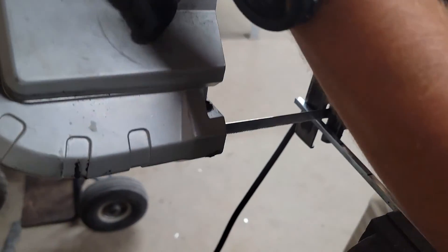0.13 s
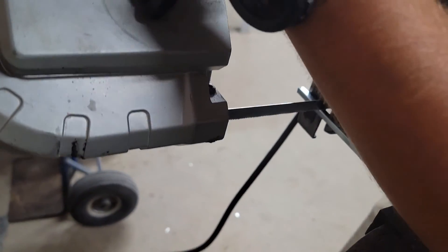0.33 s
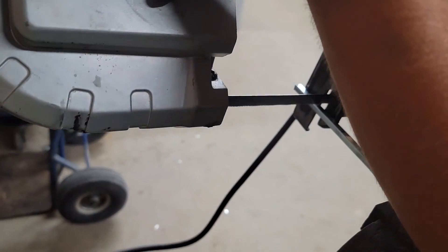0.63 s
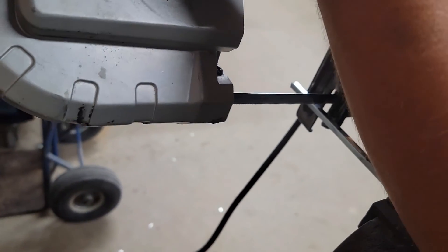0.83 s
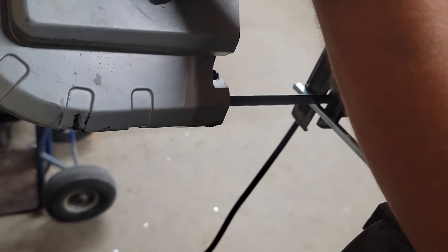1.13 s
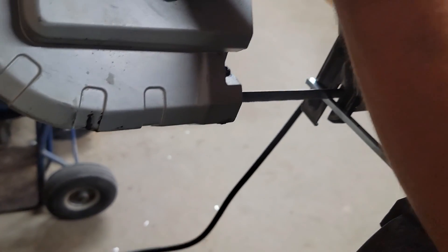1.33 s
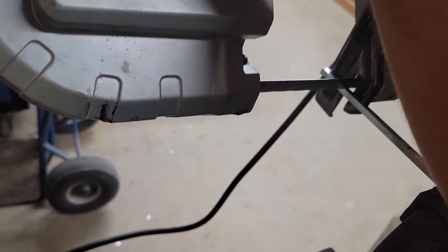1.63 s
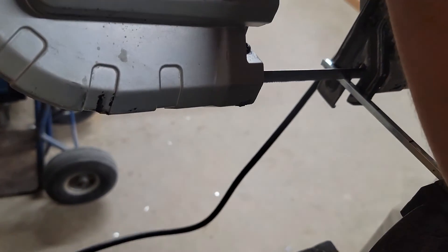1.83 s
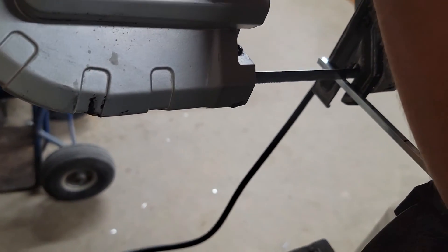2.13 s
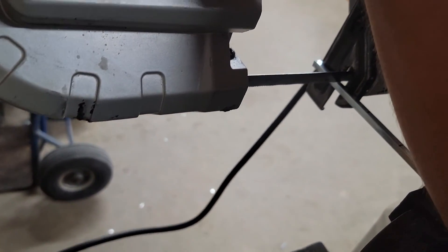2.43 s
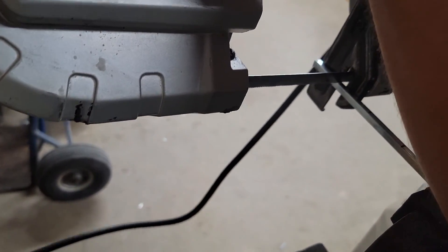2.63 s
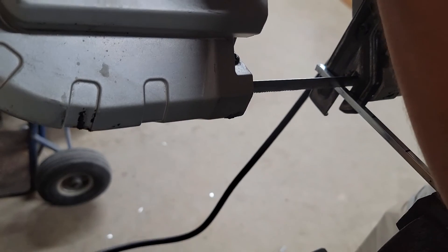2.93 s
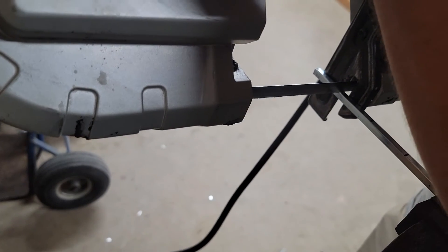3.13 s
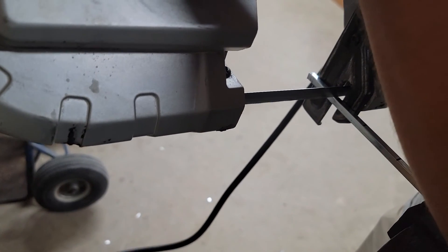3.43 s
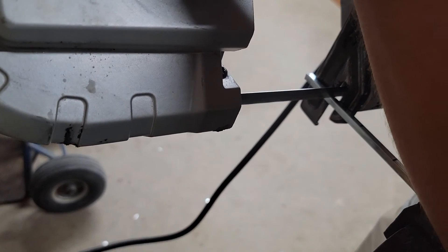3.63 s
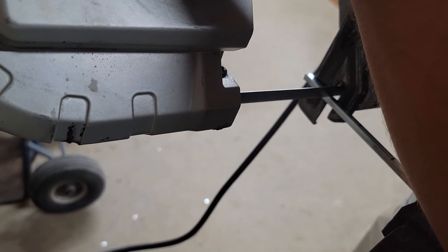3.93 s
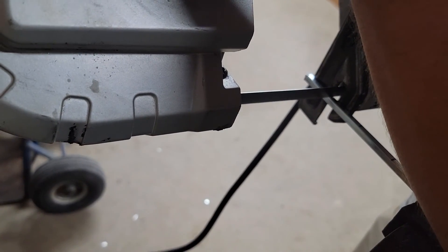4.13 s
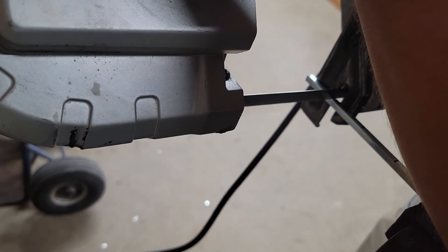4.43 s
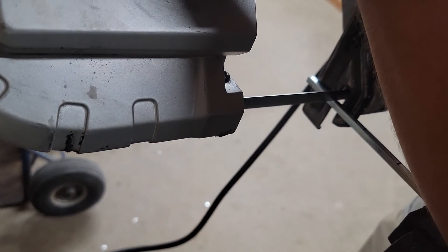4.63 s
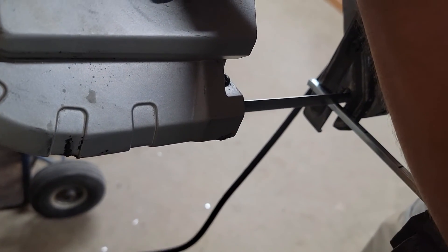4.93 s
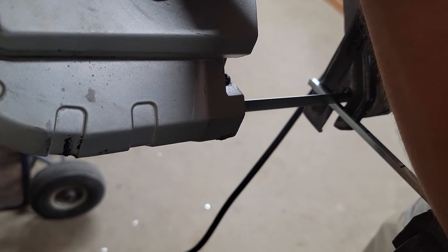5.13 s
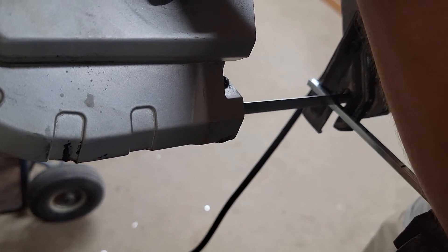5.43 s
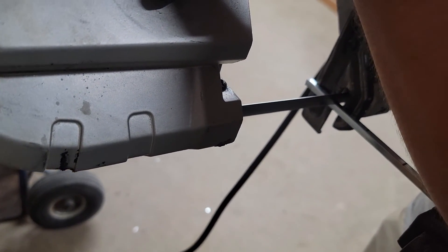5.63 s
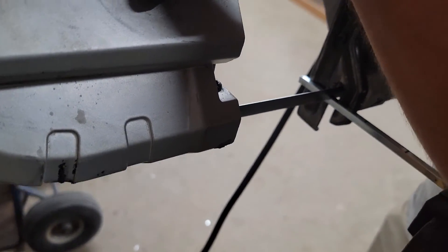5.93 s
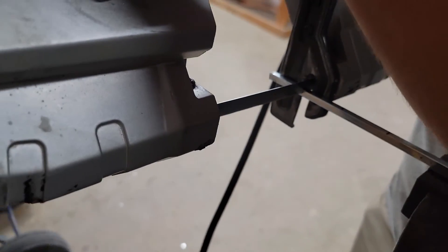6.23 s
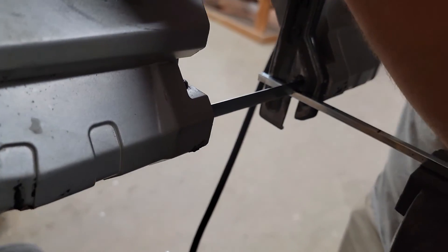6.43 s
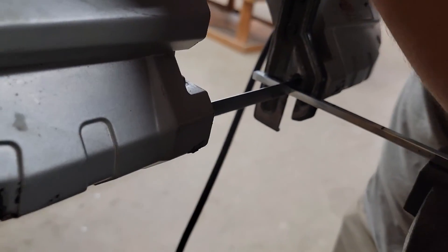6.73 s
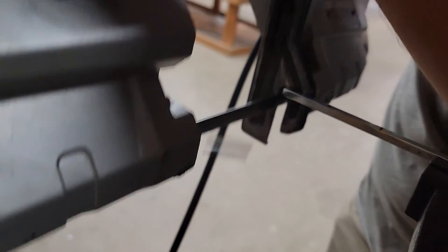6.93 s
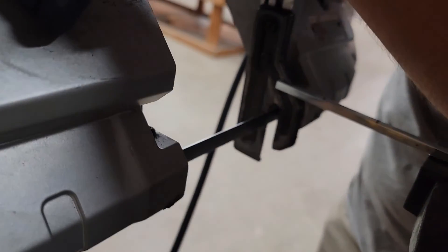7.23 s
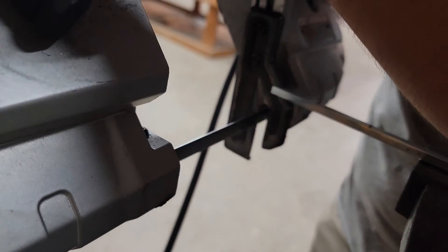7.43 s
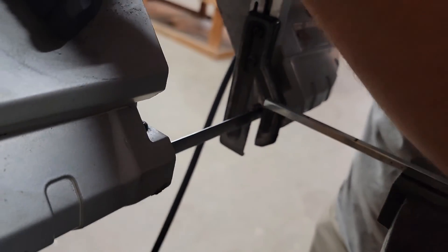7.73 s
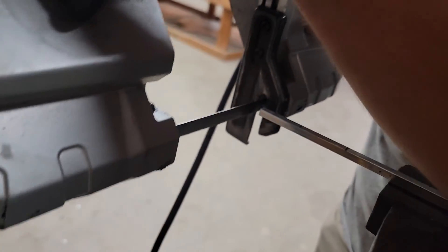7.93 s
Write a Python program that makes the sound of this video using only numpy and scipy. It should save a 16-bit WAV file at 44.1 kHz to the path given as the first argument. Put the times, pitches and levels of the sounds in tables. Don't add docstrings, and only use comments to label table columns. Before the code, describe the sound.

A hand-held saw knocks and buzzes while stalled, then roars into a harsh metal cut with whining gears before its pitch sinks on release.

```python
import sys
import numpy as np
from scipy import signal
from scipy.fft import rfft, irfft, next_fast_len
from scipy.io import wavfile
from scipy.ndimage import map_coordinates

SR = 44100
rng = np.random.default_rng(int(sys.argv[2]) if len(sys.argv) > 2 else 0)


def dump(signal):
    limited = np.clip(np.atleast_2d(signal).T, -1, 1)
    pcm = np.round(limited * 32767).astype(np.int16)
    wavfile.write(sys.argv[1], SR, pcm)


def volts_from_db(level):
    exponent = np.asarray(level, float) / 20
    return 10 ** exponent


N = 355975


def unit(x):
    return x / np.sqrt(np.mean(x ** 2) + 1e-20)


def along(points, hz):
    f, v = np.transpose(points)
    return np.interp(np.log(hz + 1), np.log(f + 1), v)


def curves(rows):
    s, *cols = np.transpose(rows)
    t = np.arange(N) / SR
    gate = np.clip(np.minimum(t - s[0], s[-1] + .01 - t) / .01, 0, 1)
    return [gate] + [np.interp(t, s, c) for c in cols]


def wobble(rate):
    knots = rng.standard_normal(int(N * rate / SR) + 4)
    return map_coordinates(knots, [np.arange(N) * rate / SR])


def filtered(x, response):
    m = next_fast_len(N + SR // 2)
    return irfft(rfft(x, m) * response(np.fft.rfftfreq(m, 1 / SR)), m)[..., :N]


def coloured(x, spectrum):
    return unit(filtered(x, lambda hz: volts_from_db(along(spectrum, hz))))


def modes(peaks):
    def response(f):
        total = 0
        for k, (centre, width, db) in enumerate(peaks):
            damping = 1j * f * width
            total = total + (-1) ** k * volts_from_db(db) * damping / (centre * centre - f * f + damping)
        return total
    return response


def grit(spread_db, speed):
    return rng.standard_normal(N) * volts_from_db(spread_db * wobble(speed))


# [f/Hz, level/dB]
AIR_SPECTRUM = [(18, -45), (30, -18), (43, -5.5), (75, -3), (127, -13.5), (145, -21.5), (232, -20.5),
                (258, -22.5), (344, -21), (459, -22.5), (1530, -30.5), (2210, -32), (4610, -43.5),
                (15800, -59)]
# [f/Hz, likeness -1..1]
AIR_LIKENESS = [(60, 0.55), (180, 1), (550, -0.38), (1650, -0.39), (4970, 0.31), (15000, 0.0)]


def background():
    def spread(hz):
        turn = np.arccos(np.clip(along(AIR_LIKENESS, hz), -1, 1)) / 2
        return volts_from_db(along(AIR_SPECTRUM, hz)) * [np.cos(turn), np.sin(turn)]

    noise = rng.standard_normal((2, N)) * volts_from_db(1.1 * wobble(9))
    mid, side = filtered(noise, spread)
    return volts_from_db(-58) * unit(np.array([mid + side, mid - side]))


# [f/Hz, t60/s]
SHOP_DECAY = [(100, 1), (1000, 0.95), (4000, 0.49), (14000, 0.69)]
# [f/Hz, level/dB]
ECHO_LEVEL = [(60, -12), (250, 4), (600, -0.5), (1500, -5.5), (3000, 8.5), (6000, 2.5), (14000, 8)]


def shop(x, early_db=-6.0, size=24576):
    hop = size // 2
    wet = filtered(x, lambda hz: volts_from_db(along(ECHO_LEVEL, hz)))
    wet = np.pad(wet, (hop + 130, size))
    window = np.sin(np.pi * np.arange(size) / size)
    out = np.zeros((2, len(wet) + SR))
    for start in range(0, N + hop, hop):
        hz, t, z = signal.stft(rng.standard_normal((2, SR // 2)), SR, nperseg=256)
        late = volts_from_db(-60 * t / along(SHOP_DECAY, hz)[:, None] - 8.5)
        early = volts_from_db(early_db - 60 * t / 0.014)
        tail = signal.istft(z * (late + early), SR, nperseg=256)[1]
        piece = wet[start:start + size] * window
        echo = signal.fftconvolve(piece[None], tail / np.linalg.norm(tail[0]), axes=1)
        out[:, start:start + echo.shape[1]] += echo
    return out[:, hop:hop + N]


# [t/s, level/dB, hiss over it/dB]
SLIDES = [
    [(0.0, -41, -4), (0.038, -54.5, -12), (0.3, -69.5, -2)],
    [(0.605, -41.5, -12), (0.677, -33, -3.5), (0.95, -89, -17)],
]
# [f/Hz, level/dB]
RUB_SPECTRUM = [(88, -55), (150, -22), (297, -8), (406, -6), (540, -11.5), (851, -4.5), (1690, -2.5),
                (2120, 2.5), (4500, -13), (5850, -40), (9900, -120)]
HISS_SPECTRUM = [(2060, -20), (3500, 0), (4500, -5), (6530, -5), (10100, -21), (10900, -24), (15400, -16),
                 (16300, -25)]


def scrape():
    rub = coloured(grit(spread_db=-2.0, speed=160), RUB_SPECTRUM)
    hiss = coloured(grit(spread_db=0.0, speed=170), HISS_SPECTRUM)
    total = 0
    for gate, db, hiss_db in map(curves, SLIDES):
        total = total + gate * volts_from_db(db - 2.0) * (rub + volts_from_db(hiss_db) * hiss)
    return total


# [t/s, peak level/dB, thud over it/dB]
HAND_BUMPS = [(.232, -53, -18), (.35, -61.5, 14.5), (.404, -49, -9), (.463, -41.5, -19), (.4995, -53, -8),
              (.828, -52, -15), (.866, -52.5, -40), (1.118, -52, -27), (1.154, -63, -15), (1.692, -64, -25),
              (2.943, -40, -22), (3.041, -40.5, -21), (3.209, -37, -39)]
# [t/s, peak level/dB, tick over it/dB]
BLADE_JOLTS = [(.578, -40, -21), (.5875, -23.5, -26), (.596, -31, -24), (2.318, -40.5, -11),
               (2.384, -45, -10), (2.744, -45, -7), (2.785, -41, -8), (2.82, -43.5, -6), (2.963, -36, -16),
               (3.012, -42, -26), (3.18, -40, -25), (3.319, -67, -55), (3.368, -36, -22), (3.775, -26, -9)]
# [t/s, peak level/dB, housing over it/dB]
TOOTH_TAPS = [(1.081, -53.5, 9), (1.3335, -56, 11), (1.351, -34.5, -2.5), (1.391, -42.5, 0.5),
              (1.496, -51.5, 3)]
# [thud/dB, housing/dB, clack/dB, tick/dB, t60/s]; None = the row's own column
BUMP_MIX = (None, .1, -11, -19, 0.061)
JOLT_MIX = (-26, -8, .1, None, 0.054)
TAP_MIX = (-36, None, .1, -0.66, 0.037)
# [f/Hz, width/Hz, level/dB]
THUD_MODES = [(85, 18, -2), (249, 120, 6), (366, 115, 2)]
CASE_MODES = [(556, 24, 5), (647, 9.1, 3.5), (804, 39, 5), (1209, 24, 9), (1435, 69, -11.5)]
CLACK_MODES = [(1860, 510, 3.5), (2580, 520, 7.5), (3630, 1300, -13.5)]
TICK_MODES = [(5300, 1200, -4), (6750, 700, 0), (7600, 700, 0), (9500, 1500, -12), (13000, 3000, -20)]


def knocks():
    force = np.zeros((4, N + SR))
    t = np.arange(SR // 5) / SR
    rise = 1 - np.exp(-t / np.array([[.003], [.003], [.0008], [.0003]]))
    faster = np.array([[.8], [1], [1.3], [2.2]])
    part_gain_db = np.array([27.5, 19.5, 14, 14])
    kinds = [(HAND_BUMPS, BUMP_MIX), (BLADE_JOLTS, JOLT_MIX), (TOOTH_TAPS, TAP_MIX)]
    for rows, (*mix_db, t60) in kinds:
        fall_db = -60 * t / np.clip(t60, .01, .2) * faster
        for s, db, own_db in rows:
            parts_db = np.array([own_db if part is None else part for part in mix_db])
            level_db = db + parts_db + part_gain_db
            rattle = rng.standard_normal(len(t)) * volts_from_db(level_db[:, None] + fall_db) * rise
            start = round(s * SR)
            force[:, start:start + len(t)] += rattle
    bodies = [THUD_MODES, CASE_MODES, CLACK_MODES, TICK_MODES]
    return sum(filtered(f[:N], modes(body)) for f, body in zip(force, bodies))


# [t/s, buzz level/dB]
SQUEEZES = [
    [(2.3, -64), (2.32, -46), (2.345, -54.5), (2.5, -47.5), (2.65, -45.5), (2.76, -47), (2.81, -45),
     (2.85, -49), (2.91, -55)],
    [(2.92, -55), (2.96, -39), (3.01, -46), (3.08, -50.5), (3.2, -42.5), (3.3, -45), (3.45, -37),
     (3.7, -48), (3.8, -26)],
]
# [f/Hz, width/Hz, level/dB]
COIL_MODES = [(228, 21, -19), (479, 3.2, -6), (690, 55, 0.5), (1416, 31, -10), (1820, 180, -10.5),
              (2340, 135, -4.5), (3110, 120, -12.5), (4630, 460, -27)]
# [mains order, level/dB]
CORE_HUM = [(2, -10), (4, 5), (6, 1.5), (8, 8)]
CORE_HUM_DB = (-56.5, -57.5)
# [from t/s, to t/s, level/dB]
ARCING = [
    (2.299, 2.834, -55.5),
    (2.898, 2.98, -54.5),
    (3.15, 3.8, -67),
]
# [f/Hz, level/dB]
SIZZLE_SPECTRUM = [(2000, -11), (3400, 1.5), (3720, -14), (4970, -8), (6760, -13), (7840, -2), (9150, -12),
                   (11100, -28), (11900, -18), (12700, -5), (15100, -27), (15800, -34)]
MAINS_HZ = 60
CREEP_S, CREEP_ROUGHENS_PER_S = 2.95, 3
HUM_FOLLOWS = .2


def stall():
    half = np.arange(N) * 2 * MAINS_HZ / SR + .62
    count = np.floor(half)
    kicks = np.diff(count, prepend=0) * np.where(count % 2, 1, .5) * volts_from_db(1.8 * wobble(90))
    rough = .45 + CREEP_ROUGHENS_PER_S * np.clip(np.arange(N) / SR - CREEP_S, 0, .5)
    drive = (unit(kicks) + rough * rng.standard_normal(N)) / np.hypot(1, rough)
    buzz = unit(filtered(drive, modes(COIL_MODES)))
    hum = unit(sum(volts_from_db(db) * np.sin(np.pi * order * half + order ** 2) for order, db in CORE_HUM))
    spark = .15 + np.exp(-((half / 2 - .43) % 1) / .12)
    sizzle = coloured(spark * rng.standard_normal(N), SIZZLE_SPECTRUM)
    arcing = sum(volts_from_db(db) * curves([(start,), (end,)])[0] for start, end, db in ARCING)
    core = 0
    for (gate, db), hum_db in zip(map(curves, SQUEEZES), CORE_HUM_DB):
        core = core + gate * (volts_from_db(db) * buzz + volts_from_db(hum_db + HUM_FOLLOWS * (db + 47)) * hum)
    return core + arcing * sizzle


# [t/s, peak level/dB]
SEAM_PASSES = [
    (4.4994, -95),
    (5.0619, -4),
    (5.6144, -4.5),
    (6.1723, -2.5),
    (6.7406, -6),
    (7.2994, -22),
]


def weld():
    shape = np.zeros(N + SR)
    t = np.arange(SR // 10) / SR
    for s, db in SEAM_PASSES:
        shape[round(s * SR):][:len(t)] += volts_from_db(db - 8.0 - 60 * t / 0.046)
    spit = coloured(rng.standard_normal(N), [(3000, -40), (5000, 4), (9000, 12.0), (16000, -3.0)])
    return shape[:N] * spit


# [t/s, gear mesh f/Hz]
MESH_SPEED = [(3.55, 590), (3.64, 715), (3.69, 612), (3.9, 1095), (4.0, 1400), (4.14, 2360), (4.2, 2703),
              (4.3, 3003), (4.42, 3150), (4.55, 3235), (4.7, 3292), (5.0, 3322), (5.3, 3308), (5.5, 3281),
              (6.1, 3239), (6.6, 3206), (6.9, 3223), (7.15, 3270)]
# [level at full speed/dB, growth with speed, once tipped/dB, once unloaded teeth rattle/dB]
MESH_ORDERS = [(-40, .3, 9, -11), (-29, 1.3, -6, -2), (-38.5, .8, -1.5, 2), (-34.5, 1.5, -5, 2)]
# [shaft order, level at full speed/dB, growth with speed]
SHAFT_ORDERS = [(12, -38, 1.7), (24, -41, 1.2), (36.4, -37, 3)]
# [f/Hz, level/dB]
CASING = [(600, -7), (1300, 10), (2300, 11.5), (3400, 4), (4400, -8), (5700, 1), (7000, 0), (13000, -6)]
PINION, GEAR = 9, 65
RELEASE_S, DRAG_PER_S, RUB_HZ, FULL_HZ = 7.2, .89, 800, 3300
SHAFT_DB, SHAFT_GROWS = -49, 2.4
TIP_S, TIP_TAKES_S = 5.95, .35


def gears():
    t = np.arange(N) / SR
    coasting = np.maximum(t - RELEASE_S, 0)
    mesh_hz = (curves(MESH_SPEED)[1] + RUB_HZ) * np.exp(-DRAG_PER_S * coasting) - RUB_HZ
    speed = mesh_hz / FULL_HZ
    mesh = 2 * np.pi * np.cumsum(mesh_hz) / SR
    shaft = mesh / PINION
    whine = volts_from_db(SHAFT_DB + 5.5 * wobble(35)) * speed ** SHAFT_GROWS * np.sin(shaft + 1.6 * wobble(25))

    tipped = np.clip((t - TIP_S) / TIP_TAKES_S, 0, 1)
    unloaded = np.minimum(coasting / .1, 1)
    runouts = [2.2, 1.4, .6, 1.3]
    for k, ((db, growth, tip_db, rattle_db), runout) in enumerate(zip(MESH_ORDERS, runouts), 1):
        swell = unit(1 + runout * np.sin(mesh / GEAR + k))
        level_db = db + tip_db * tipped + rattle_db * unloaded + along(CASING, k * mesh_hz)
        tone = np.sin(k * mesh + .4 * wobble(35))
        whine += volts_from_db(level_db + 2.8 * wobble(12)) * speed ** growth * swell * tone

    for order, db, growth in SHAFT_ORDERS:
        level_db = db + along(CASING, order * mesh_hz / PINION) + 3 * wobble(4.4)
        whine += volts_from_db(level_db) * speed ** growth * np.sin(order * shaft + .45 * wobble(40))
    turning = np.clip((t - MESH_SPEED[0][0]) / .03, 0, 1)
    return turning * np.sqrt(2) * whine


# [t/s, housing roar level/dB]
CUT_ROAR = [(3.05, -55.5), (3.25, -46), (3.5, -40.5), (3.65, -32), (3.95, -23), (4.1, -16), (4.3, -15.5),
            (5.0, -15.5), (5.2, -17), (5.5, -15.5), (5.7, -18), (6.1, -17), (6.9, -17.5), (7.15, -17),
            (7.35, -19.5), (7.6, -22.5), (7.9, -28), (8.07, -31)]
# [f/Hz, width/Hz, level/dB]
HOUSING_MODES = [(803, 227, 0.5), (1271, 374, -1.5)]
# [f/Hz, level/dB]
ROAR_SPECTRUM = [(180, -62), (300, -10), (355, -3.5), (452, -6), (521, -4), (818, -5.5), (899, -7.5),
                 (1230, 0), (1500, 3.5), (1950, -55), (3300, -120)]
BAR_SPECTRUM = [(1300, -36), (1520, -4), (1720, 4), (1900, 1), (2200, -9.5), (2500, -28)]
RING_SPECTRUM = [(1240, -22), (2100, 5.5), (2420, 7), (2750, 2), (3270, 2), (3760, -1.5), (4600, -5.5),
                 (5780, -6), (6610, -4.5), (8000, -22), (10400, -43), (17600, -120)]
FIZZ_SPECTRUM = [(4120, -19), (7000, -0.5), (8680, -8), (9610, -6.5), (10400, -10), (11400, -11),
                 (14400, -1.5), (15200, -1), (15800, -16.5)]
RUMBLE_SPECTRUM = [(32, -53), (55, -18), (151, -10.5), (226, -4.5), (269, -6), (355, -2), (448, -16),
                   (500, 0.5), (650, -5.5), (1100, -120)]
BAR_DB, BAR_FADES_DB_PER_S = 1, 2.5
RING_DB, RING_LAGS = -3, 0.17
FIZZ_DB, CHIPS_FROM_DB, FIZZ_GROWS = -4, -14.5, 0.29
BITE_S = 0.31


def cutting():
    gate, roar_db = curves(CUT_ROAR)
    since = np.maximum(np.arange(N) / SR - CUT_ROAR[0][0], 1e-3)
    bite_db = 20 * np.log10(np.minimum(since / BITE_S, 1))
    bar_db = BAR_DB - BAR_FADES_DB_PER_S * since + bite_db
    ring_db = RING_DB - RING_LAGS * (roar_db - roar_db.max()) + bite_db
    fizz_db = FIZZ_DB + FIZZ_GROWS * np.minimum(roar_db - CHIPS_FROM_DB, 0)
    load = wobble(11) + 1.3 * wobble(40)
    teeth = grit(spread_db=1.0, speed=300)
    shaken = unit(filtered(teeth, modes(HOUSING_MODES)))
    roar = volts_from_db(0.8 * load) * coloured(teeth + 0.84 * shaken, ROAR_SPECTRUM)
    bar = volts_from_db(bar_db + 0.31 * load) * coloured(teeth, BAR_SPECTRUM)
    ring = volts_from_db(ring_db + 0.11 * load) * coloured(grit(spread_db=4.0, speed=500), RING_SPECTRUM)
    fizz = volts_from_db(fizz_db + 0.54 * load) * coloured(grit(spread_db=5.0, speed=700), FIZZ_SPECTRUM)
    rumble = volts_from_db(-18) * coloured(rng.standard_normal(N), RUMBLE_SPECTRUM)
    return gate * volts_from_db(roar_db - 4.5) * (roar + bar + ring + fizz + rumble)


# [f/Hz, left lead/rad]
PORT_LEAD = [(0, 0), (690, -.2), (1210, 1.2), (2300, 2), (3100, 4.7), (5000, 5.6), (6600, 7.6), (8000, 8),
             (9500, 11.4), (12500, 13.4), (16000, 14.4)]
# [f/Hz, left over right/dB]
PORT_TILT = [(60, -8), (110, 2), (200, -4), (380, -2.5), (700, -4.5), (1290, -2.5), (2380, -3.0),
             (4400, -1.5), (8120, 0), (15000, -1.5)]
# [t/s, left over right/dB]
SAW_SWING = [
    (0.0, 0),
    (0.47, -4.5),
    (0.83, -3.5),
    (8.07, -2),
]


def scene():
    cut, whine, seam, slide, knock, buzz = cutting(), gears(), weld(), scrape(), knocks(), stall()
    half = np.array([[.5], [-.5]])
    saw = cut + whine + seam + slide + knock + buzz
    direct = filtered(saw, lambda hz: np.exp(1j * half * along(PORT_LEAD, hz)))
    echoes = shop(cut + volts_from_db(-5) * slide + volts_from_db(-5) * whine + volts_from_db(-12) * (seam + buzz + knock))

    def ports(hz):
        return volts_from_db(half * along(PORT_TILT, hz)) / np.hypot(1, volts_from_db(along(ECHO_LEVEL, hz)))

    both = filtered(direct + echoes, ports)
    return both * volts_from_db(half * (curves(SAW_SWING)[1] + 2.5) + 3.5) + background()


def low_pass(x):
    return signal.sosfilt(signal.butter(12, 17040, fs=SR, output="sos"), x)


def record(dry):
    x = dry / (1 + np.abs(dry / .96) ** 6) ** (1 / 6)

    def band(hz):
        bass_cut = hz ** 2 / (hz ** 2 + 50 ** 2)
        return bass_cut * np.clip((15930 - hz) / 150, 0, 1) ** 2

    return low_pass(filtered(x, band))


dry = scene()
out = record(dry)
dump(out)
```